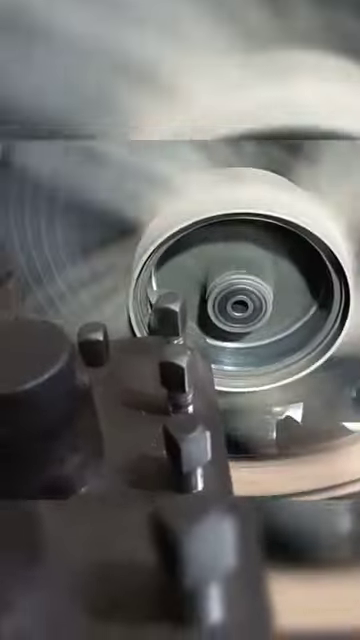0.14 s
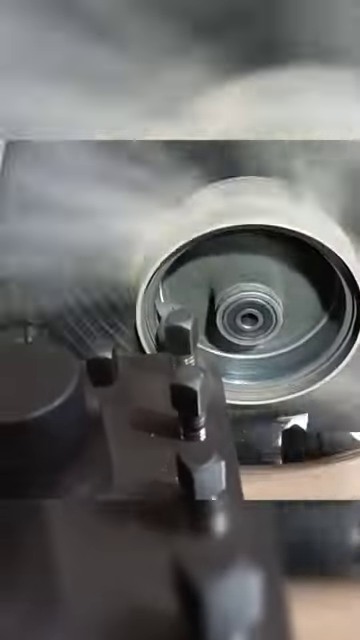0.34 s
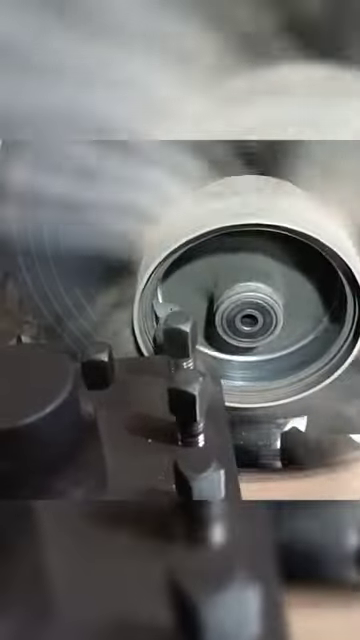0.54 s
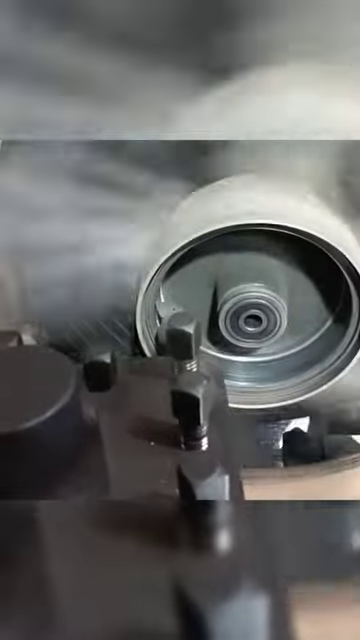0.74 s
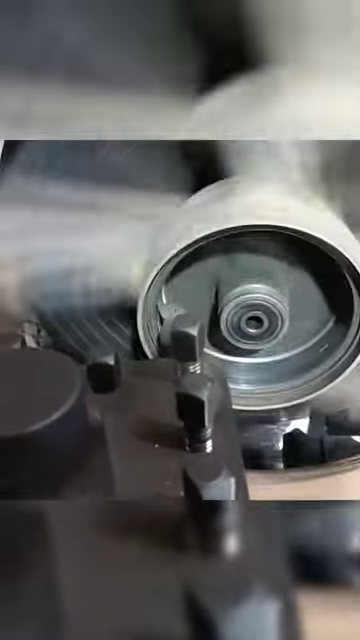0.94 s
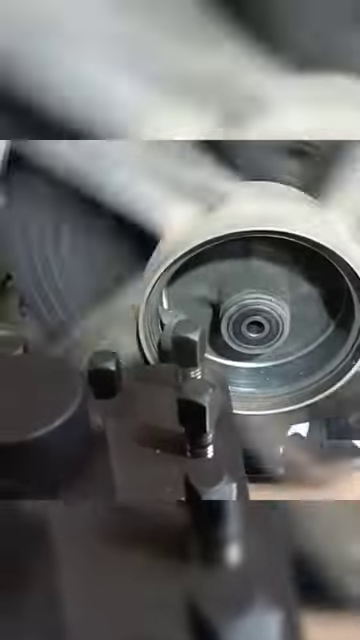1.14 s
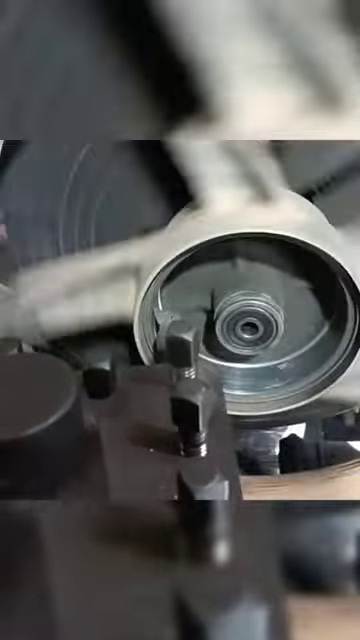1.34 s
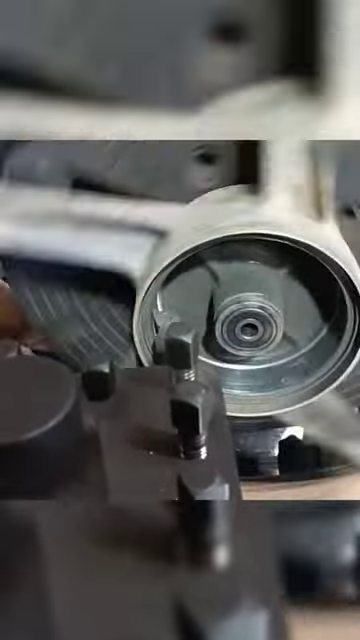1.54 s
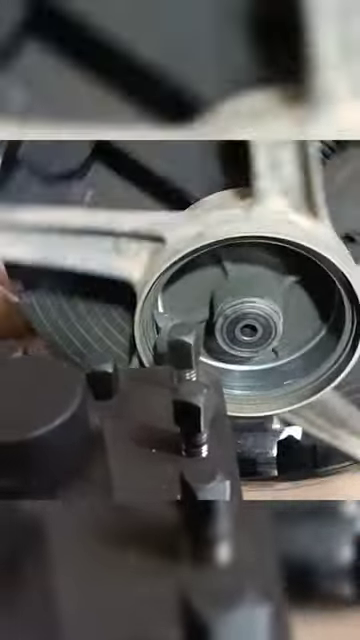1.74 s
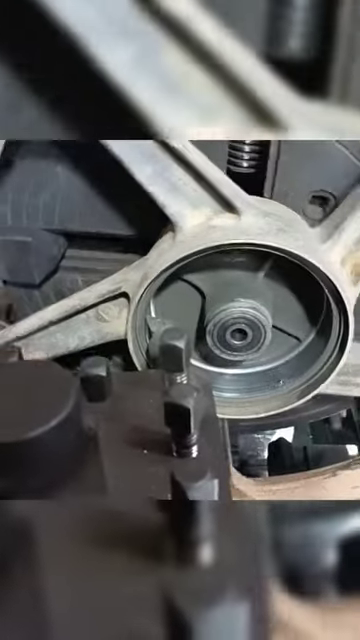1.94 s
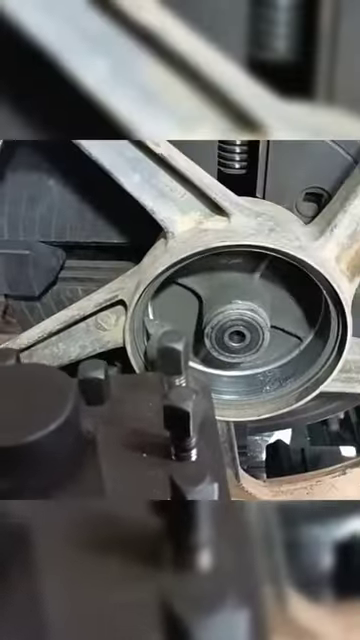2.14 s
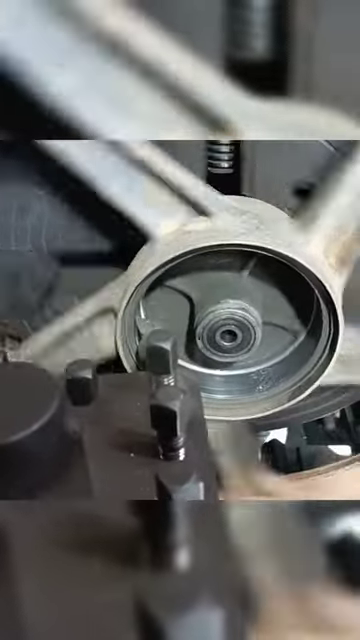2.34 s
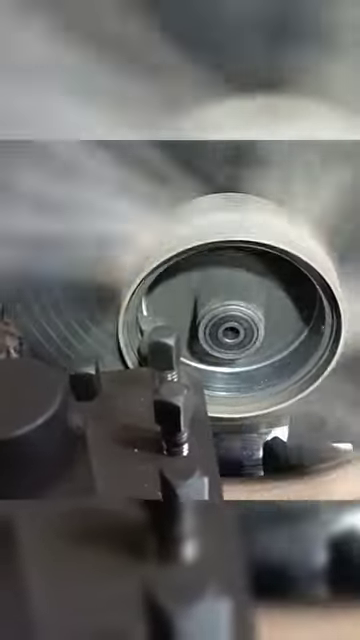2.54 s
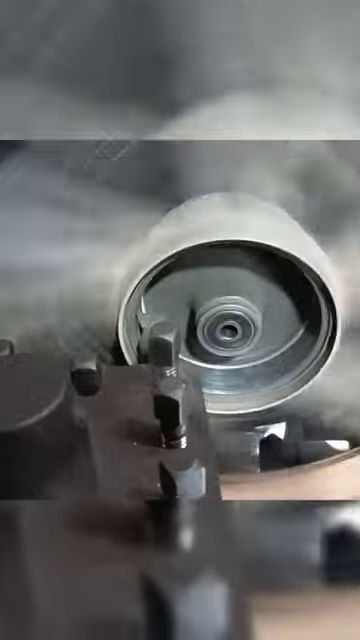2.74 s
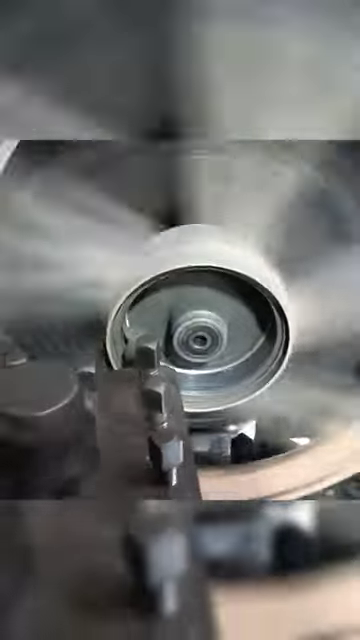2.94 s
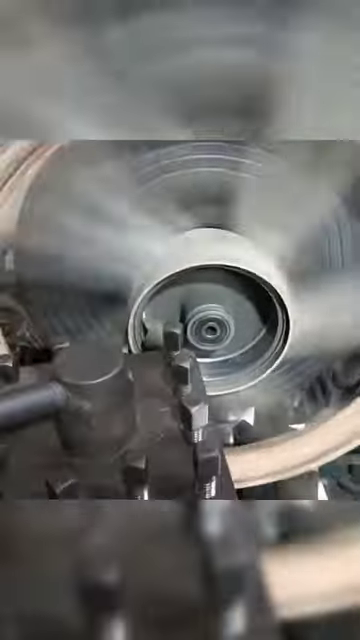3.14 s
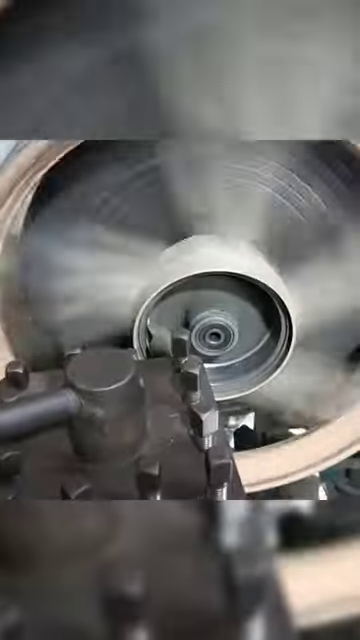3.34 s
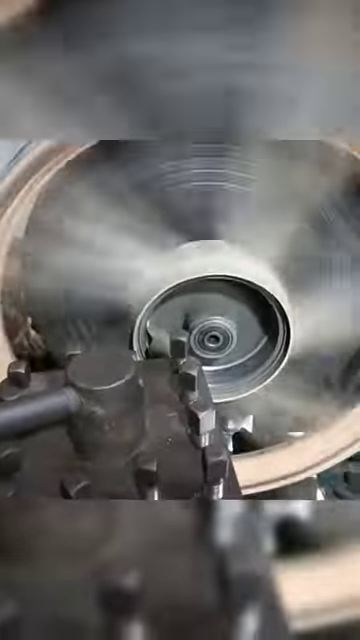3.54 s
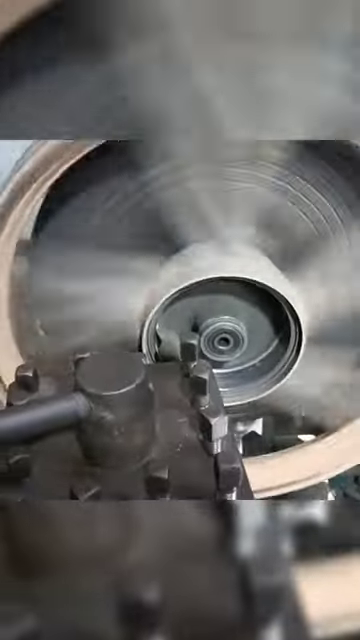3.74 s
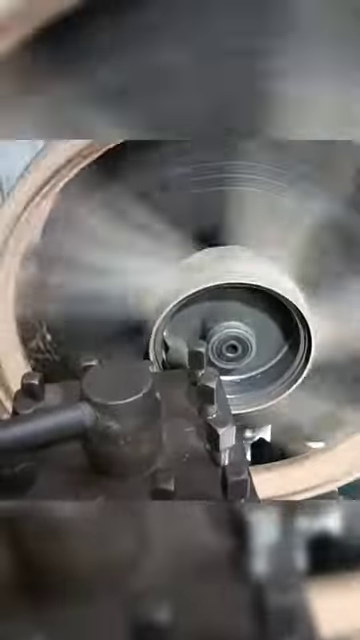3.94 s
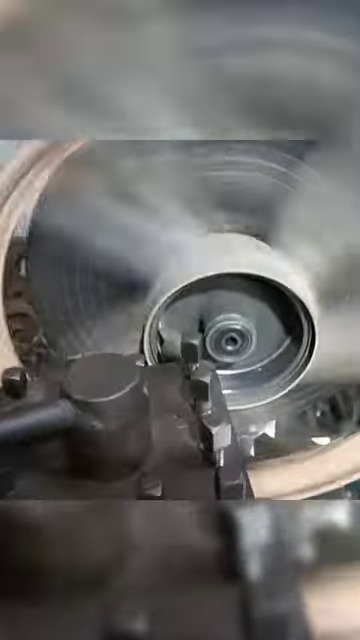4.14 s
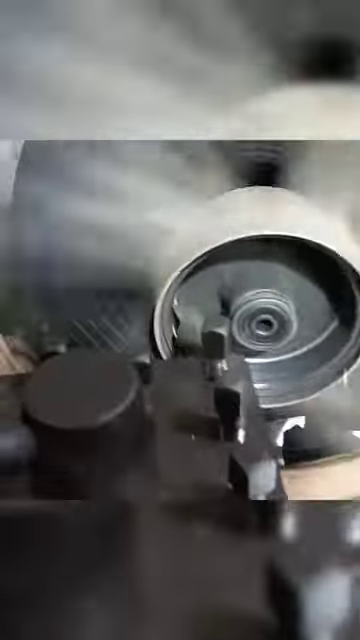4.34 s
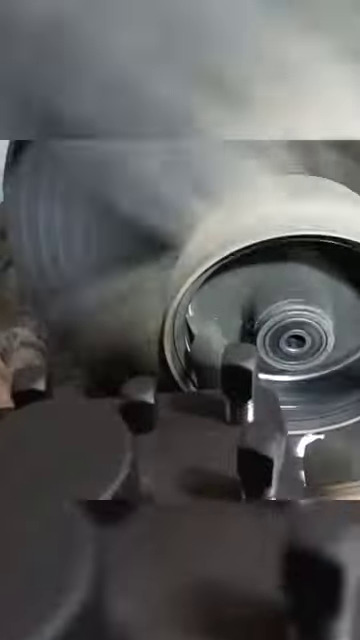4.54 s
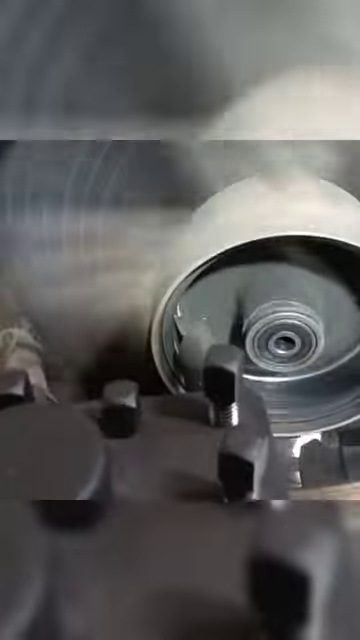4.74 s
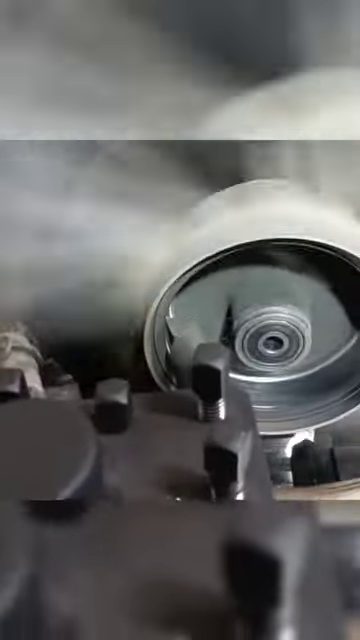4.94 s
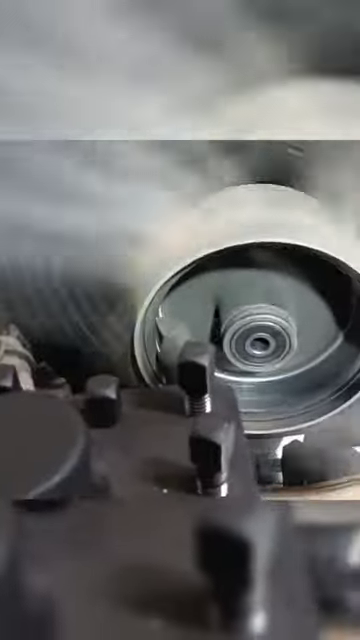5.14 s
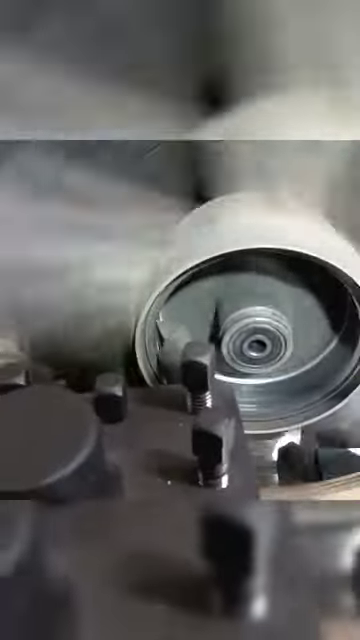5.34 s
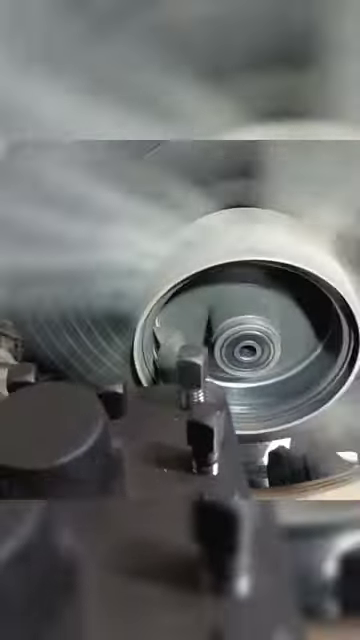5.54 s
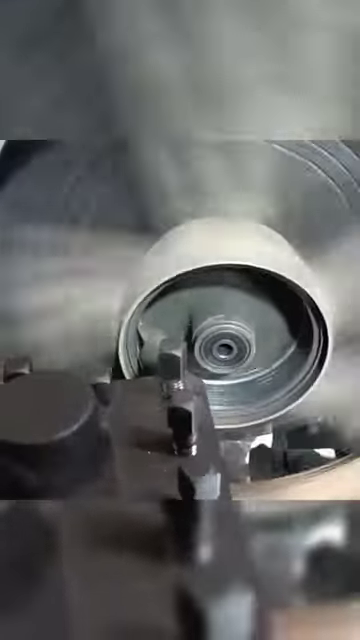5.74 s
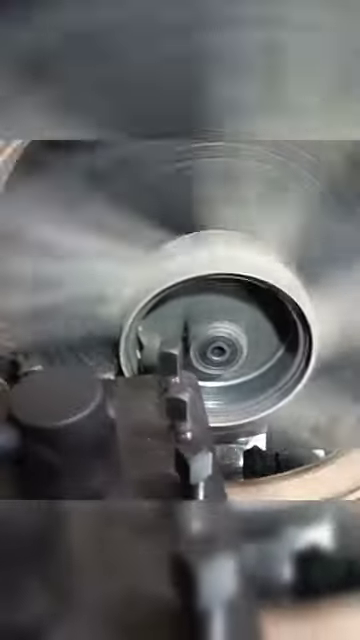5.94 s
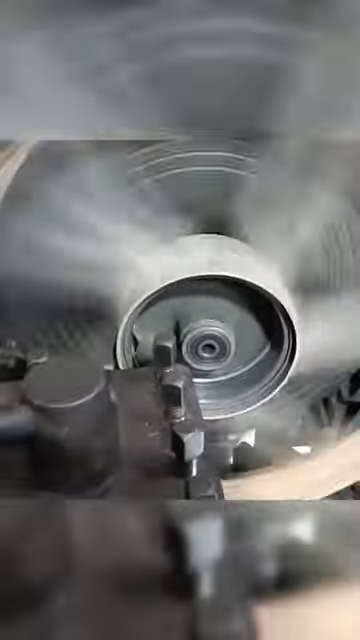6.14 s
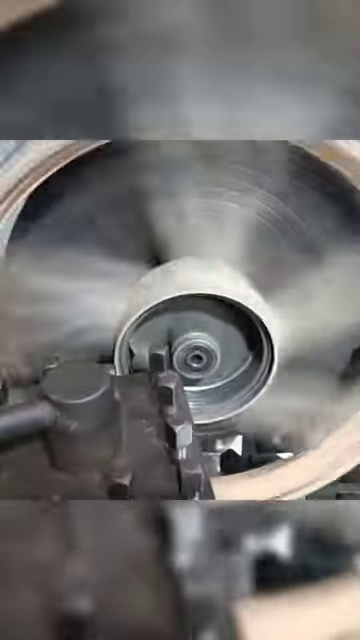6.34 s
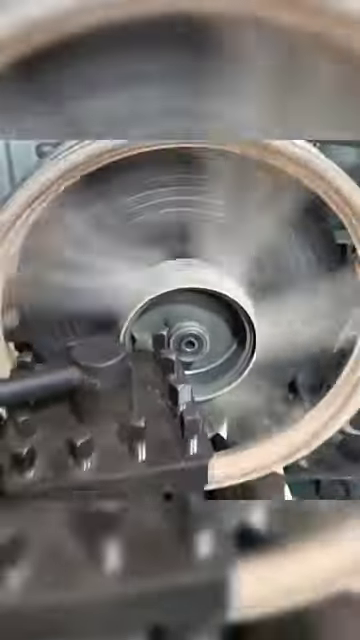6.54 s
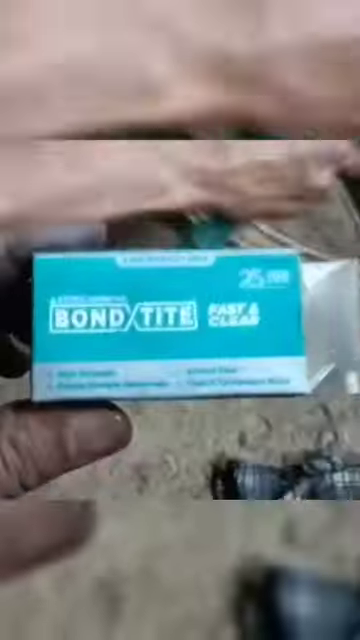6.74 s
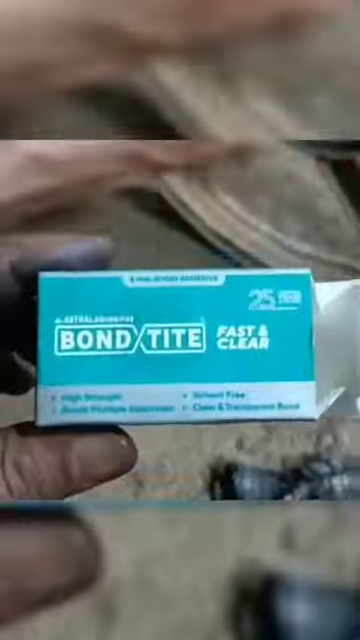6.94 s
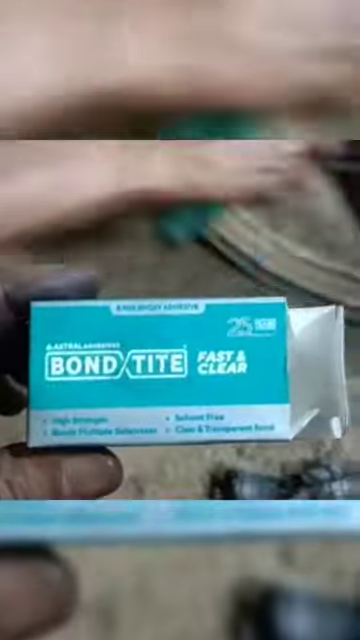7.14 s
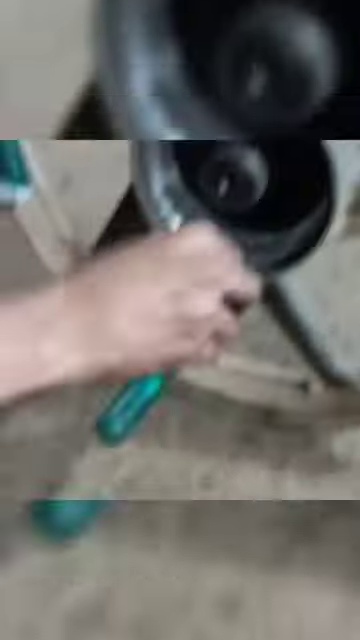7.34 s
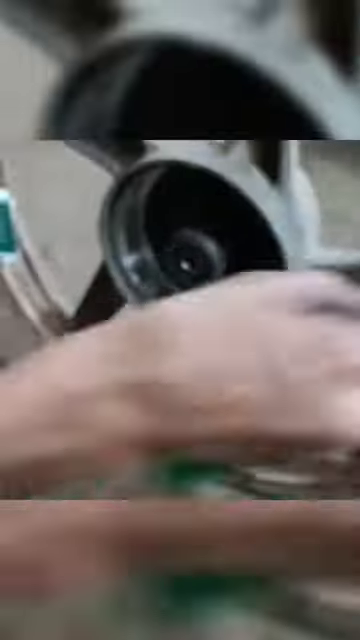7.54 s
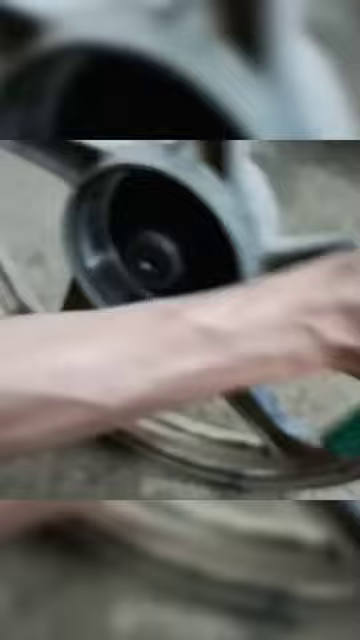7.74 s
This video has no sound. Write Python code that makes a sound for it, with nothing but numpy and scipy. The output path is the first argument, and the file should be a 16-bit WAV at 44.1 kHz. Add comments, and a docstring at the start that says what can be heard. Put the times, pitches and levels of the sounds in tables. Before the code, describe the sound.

Workshop lathe whirs, clunks, slows and restarts; a cutting tool bites rhythmically with loud screechy rasps, then abruptly someone taps and rubs a loose metal wheel.

```python
"""In a workshop, heard by two microphones, a lathe with a humming motor spins a spoked wheel with a brake drum.
Its clutch is thrown out with a double knock, the gears run down, and it is thrown in again; parts squeak and graze.
A boring tool bites the out-of-round drum once a turn, for a second all the way round: noise of tearing chips,
the drum's resonances and a wandering chatter tone make the harsh rasp.
After an abrupt break the wheel is off the lathe, and something is tapped and rubbed inside its ringing drum."""
import sys
import numpy as np
from scipy import signal
from scipy.fft import rfft, irfft, next_fast_len
from scipy.io import wavfile
from scipy.ndimage import uniform_filter1d, map_coordinates

SR = 44100
rng = np.random.default_rng(int(sys.argv[2]) if len(sys.argv) > 2 else 0)


def output_pcm(signal):
    """Save a mono or channel-first signal as 16-bit PCM at the path in sys.argv[1].

    Samples are clipped to [-1, 1] before scaling.
    """
    pcm = np.clip(np.atleast_2d(signal).T, -1, 1) * 32767
    wavfile.write(sys.argv[1], SR, np.round(pcm).astype(np.int16))


N = 343539
TIME = np.arange(N) / SR
LATHE_END_S = 6.77  # the lathe is heard up to here, the loose drum from here on

# drum and tool holder, close at the tool: columns pitch_hz [Hz], width_hz [Hz], level_db [dB, relative]
DRUM_MODES = [(942.5, 13.7, -2.5), (1227, 32, -4.5), (1845, 40, -7), (2275, 31, -0.5), (2562, 34, -1),
              (3430, 75, -21), (4073, 71, 6), (4350, 60, 3), (4593, 58, 2.5), (4880, 59, -1), (5625, 48, 6),
              (5797, 55, 4), (6190, 51, 1), (7790, 107, -3.5), (7860, 33, -5)]
# noise of chips tearing off: columns pitch_hz [Hz], level_db [dB per Hz, relative]
TEARING_SPECTRUM = [(100, -8), (400, -15.5), (800, -13.5), (1300, 4.5), (2400, 8.5), (4500, 13),
                    (7000, 7.5), (8800, 5.5), (10500, -0.5), (11200, -70.5), (12500, -16), (14300, -45),
                    (15200, -29)]
# lean of the cut between the microphones: columns pitch_hz [Hz], left_minus_right_db [dB]
CUT_BALANCE = [(400, 1.5), (1000, 9), (2400, 1.5), (3500, -2.5), (4500, -6), (5600, -7.5), (6300, -6.5),
               (7000, -0.5), (8000, 14.5), (9300, 7.5), (11000, 3.5), (14000, 8.5)]
# shaking tool post: columns pitch_hz [Hz], width_hz [Hz], level_db [dB, relative]
TOOL_POST_MODES = [(80, 25, -6), (196.5, 21, -3), (335, 48, -1.5), (1236, 130, -2)]
# the tool stays in the metal all the way round: start_s [s], attack_s [s], hold_s [s], release_s [s]
DEEP_CUT = (3.954, 0.1, 0.73, 0.16)
FULL_CUT_DB = -17.5  # tool load at full depth
SQUEAL_HZ = 5754  # the boring bar's main bending mode
# chatter gain on the load once the deep cut seats the bar, and what is added before; power of the depth
CHATTER_DB, ENTRY_CHATTER_DB, CHATTER_GROWS = -3.5, -4.5, 0.79
# the tool post shakes until the deep cut seats it: gains on the load
ENTRY_RUMBLE_DB, SEATED_RUMBLE_DB = -16.5, -36


def cutting():
    """Chips break off in uneven spurts and ring the drum; the depth of cut sets their force and brightness."""
    load = tool_load()
    force = load * amp(0.5 * wobble(70))
    depth = np.minimum(load / amp(FULL_CUT_DB), 1)
    seated = envelope(DEEP_CUT[0] + DEEP_CUT[1], DEEP_CUT[1], LATHE_END_S, 1)
    grain = fracture_grain()
    rasp = chip_rasp(grain, depth)
    rumble = unit(filtered(noise(), lambda hz: body(TOOL_POST_MODES, hz)))
    rumble_db = ENTRY_RUMBLE_DB + (SEATED_RUMBLE_DB - ENTRY_RUMBLE_DB) * seated
    # the chatter takes a moment to build up and rings on after each bite
    keep = np.exp(-1 / (0.0072 * SR))
    drive = signal.lfilter([1 - keep], [1, -keep], force * depth ** CHATTER_GROWS)
    chatter_db = CHATTER_DB + ENTRY_CHATTER_DB * (1 - seated)
    sound = force * (amp(-1.5) * rasp + amp(rumble_db) * rumble)
    sound += drive * amp(chatter_db) * bar_chatter(grain)
    sides = lambda hz: amp(np.outer([.5, -.5], along(CUT_BALANCE, hz)))
    # the lean leaves the power of both sides together unchanged
    return filtered(sound, lambda hz: sides(hz) / np.sqrt(np.mean(sides(hz) ** 2, axis=0)))


def fracture_grain():
    """Each fracture is a sharp burst of random strength that decays over some 10 ms."""
    fractures = (rng.random(N) < 260 / SR) * rng.random(N) ** 2
    bursts = signal.lfilter([1], [1, -np.exp(-1 / (0.01 * SR))], fractures)
    return unit(1.5 + unit(bursts))


def chip_rasp(grain, depth):
    """Tearing noise and the drum's resonances, both driven by the fractures; a shallow cut is duller."""
    tearing = coloured(grain * rng.standard_normal((2, N)), TEARING_SPECTRUM)
    ringing = unit(filtered(grain * rng.standard_normal((2, N)), lambda hz: body(DRUM_MODES, hz)))
    rasp = unit(patchy(amp(-4.5) * tearing + amp(-3.5) * ringing, depth_db=3.2))
    treble = filtered(rasp, lambda hz: along([(3800, 0.025), (6500, 0.89)], hz))
    return rasp - (1 - depth ** 0.54) * treble


def bar_chatter(grain):
    """The bar's chatter swells, collapses and wanders in pitch as the chip curls."""
    pitch_hz = SQUEAL_HZ + 75 * wobble(30) + 115 * np.array([wobble(500), wobble(500)])
    swell = amp(7 * np.tanh(wobble(130)) + 1.1 * wobble(20))
    swell = swell * uniform_filter1d(grain, size=130)
    return unit(swell * np.sin(2 * np.pi * np.cumsum(pitch_hz, axis=1) / SR))


# spells in which the tool meets only the drum's high side, once a turn:
# columns first_bite_s [s], end_s [s], turn_s [s], first_level_db [dB], settled_level_db [dB]
SPELLS = [(3.035, 3.83, 0.123, -29, -17.5), (4.843, 6.8, .1257, -14.5, -16.5)]
SETTLE_S = 0.26  # time scale on which the bites approach their settled level
# one pass of the high side at full depth; lighter bites hold for less time
BITE_ATTACK_S, BITE_HOLD_S, BITE_RELEASE_S = 0.0082, .037, 0.022
BITE_SCATTER_S, BITE_SCATTER_DB = 0.0014, 0.14  # chance differences from turn to turn
DEEP_CUT_DB = -17
RUB_FROM_S, RUB_ATTACK_S, RUB_DB = 3.66, 0.23, -29  # the tool's flank rubs the drum, also between bites


def tool_load():
    """Force on the tool: a bite each turn, the deep cut and the rubbing flank add in power."""
    power = (amp(DEEP_CUT_DB + 0.42 * wobble(16)) * envelope(*DEEP_CUT)) ** 2
    flank = envelope(RUB_FROM_S, RUB_ATTACK_S, LATHE_END_S - RUB_FROM_S, RUB_ATTACK_S)
    power += (amp(RUB_DB) * flank) ** 2
    for first, end, turn, first_db, settled_db in SPELLS:
        for s in np.arange(first, end, turn):
            late, harder = rng.standard_normal(2)
            db = settled_db + (first_db - settled_db) * np.exp(-((s - first) / SETTLE_S) ** 2)
            hold = BITE_HOLD_S * np.sqrt(min(amp(db - FULL_CUT_DB), 1))
            bite = envelope(s + BITE_SCATTER_S * late, BITE_ATTACK_S, hold, BITE_RELEASE_S)
            power += (amp(db + BITE_SCATTER_DB * harder) * bite) ** 2
    return np.sqrt(power)


# strokes inside the loose drum, from short taps to long rubs; ring levels come before the modes' own:
# columns start_s [s], length_s [s], scrape_db [dB], low_ring_db [dB], high_ring_db [dB]
STROKES = [(6.795, 0.028, -56, -45, -46), (6.916, 0.0064, -40, -37, -46), (6.946, 0.042, -43, -36.5, -47),
           (7.078, 0.008, -43, -38.5, -53), (7.196, 0.011, -28.5, -29.5, -35.5),
           (7.272, 0.059, -37, -37.5, -38), (7.384, 0.076, -38.5, -46, -45), (7.428, 0.015, -28, -36, -55),
           (7.502, 0.049, -40, -36.5, -48), (7.569, 0.04, -35.5, -31.5, -44), (7.771, 0.036, -27, -46, -35)]
# the loose drum: columns pitch_hz [Hz], width_hz [Hz], tapped_level_db [dB], change_when_rubbed_db [dB]
LOOSE_DRUM_MODES = [(822, 92, -4, -12), (1200, 15, -14.5, -3), (1996, 16, 0.5, 1.5), (2075, 18, -1.5, -3),
                    (2320, 44, -18, -2), (2930, 18, 0.5, -10), (3330, 40, 1, -10), (3990, 17, 2, 1.5),
                    (4660, 28, -8, 1), (5640, 36, -10, 3), (6140, 50, -9, 2)]
RUB_LENGTH_S = .025  # a longer stroke is a rub
LOW_RING_HZ, HIGH_RING_HZ = 2300, 3900  # a stroke's low and high ring levels blend between these


def handling():
    """Each stroke starts sharply and fades; its friction hisses and rings the loose drum."""
    t = np.arange(SR // 2) / SR
    ring, scrape = np.zeros((2, N + SR)), np.zeros(N + SR)
    for s, length, scrape_db, low_db, high_db in STROKES:
        start = round(s * SR)
        pressure = np.exp(-t / length)
        scrape[start:][:len(t)] += amp(scrape_db) * pressure
        for hz, width, db, rubbed_db in LOOSE_DRUM_MODES:
            # a mode builds up under the stroke and then rings out; the rubbing jostles its phase
            swell = signal.lfilter([1], [1, -np.exp(-np.pi * width / SR)], pressure ** 2)
            jostle = np.cumsum(.06 * np.sqrt(pressure) * rng.standard_normal((2, len(t))), axis=1)
            tone = np.sin(2 * np.pi * (hz * t + rng.random((2, 1))) + jostle)
            stroke_db = np.interp(hz, [LOW_RING_HZ, HIGH_RING_HZ], [low_db, high_db])
            level = amp(db + rubbed_db * (length > RUB_LENGTH_S) + stroke_db)
            ring[:, start:][:, :len(t)] += level * swell / swell.max() * tone
    grit_spectrum = [(200, -15), (800, -3.5), (2400, 8.0), (4500, 2), (8000, -3.5), (14500, -14)]  # Hz, dB
    grit = coloured(amp(0.78 * wobble(500)) * noise(), grit_spectrum)
    return 1.47 * ring[:, :N] + scrape[:N] * grit


# clutch contacts: columns start_s [s], knock_db [dB, before the casting's own levels],
# hardness [dB per octave], clack_db [dB], thump_db [dB]
CLUTCH_CONTACTS = [(0.9933, -16, 6, -26.5, -53), (.998, -15.5, -2.5, -29, -63),
                   (1.002, -9.5, -0.5, -34, -33), (1.072, -24, 2, -28, -55),
                   (1.0805, -17.5, -5.5, -50, -33), (2.4211, -9, 9, -24.5, -42),
                   (2.4252, -20, -1, -37, -35), (2.438, -27, 3, -33.5, -14.5)]
# gearbox casting: columns pitch_hz [Hz], level_db [dB], t60_s [s]
CASTING_MODES = [(214, -14, 0.13), (314, -15.5, 0.18), (349, -2.5, 0.075), (406, -0.5, 0.059),
                 (507, 3.5, 0.034), (563, -6, 0.063), (683, -15.5, 0.049), (862, -26, 0.14),
                 (910, -11.5, 0.048), (1444, -29.5, 0.13)]


def clutch():
    """The dogs strike in quick clusters: casting knocks, steel clacks, the bed thumps as it takes the load."""
    t = np.arange(SR // 2) / SR
    knocks, clacks, thumps = np.zeros((3, N))
    for s, knock_db, hardness, clack_db, thump_db in CLUTCH_CONTACTS:
        start = round(s * SR)
        ring = np.zeros(len(t))
        for hz, db, t60 in CASTING_MODES:
            # a harder contact favours the higher modes
            mode_db = db + hardness * np.log2(hz / 500)
            ring += amp(mode_db - 60 * t / t60) * np.sin(2 * np.pi * hz * t)
        thump = amp(thump_db - 60 * t / 0.097) * (1 - np.exp(-t / 0.0039)) * np.sin(2 * np.pi * 135 * t)
        knocks[start:][:len(t)] += amp(knock_db) * (1 - np.exp(-t / 0.0013)) * ring
        clacks[start:][:len(t)] += amp(clack_db - 60 * t / 0.19)
        thumps[start:][:len(t)] += thump
    # the knocks carry no deep bass
    knocks = signal.sosfilt(signal.butter(4, 190, 'highpass', fs=SR, output='sos'), knocks)
    steel_spectrum = [(100, -32), (300, 2.0), (900, 8.5), (1200, 2), (2200, -2), (4700, -3.0),
                      (7000, -15.5), (14000, -14)]  # Hz, dB
    steel = coloured(noise(), steel_spectrum)
    return knocks + amp(-12.0) * room(knocks) + thumps + clacks * steel


# the workshop's decay: columns pitch_hz [Hz], t60_s [s]
ROOM_DECAY = [(150, 0.35), (1500, 0.5), (10000, 0.38)]


def room(x):
    """The workshop's short answer to a mono sound, in stereo: noise that dies at its own rate in each band."""
    hz, t, z = signal.stft(rng.standard_normal((2, SR // 2)), SR, nperseg=256)
    decay = amp(-60 * t / along(ROOM_DECAY, hz)[:, None])
    tail = signal.istft(z * decay, SR, nperseg=256)[1]
    return signal.fftconvolve(x[None], tail / np.linalg.norm(tail[0]), axes=1)[:, :N]


# rattle of loose teeth: columns pitch_hz [Hz], level_db [dB per Hz, relative]
RATTLE_SPECTRUM = [(35, -17.5), (60, 0), (174, -9.5), (229, -12.5), (491, -8.5), (539, -1), (711, -4),
                   (960, 2), (1630, -4.5), (2780, -5), (4310, -7.5), (4730, -4.5), (6530, -19),
                   (15000, -57)]
# headstock: columns pitch_hz [Hz], width_hz [Hz], level_db [dB, relative]
HEADSTOCK_MODES = [(369, 55, 3.5), (535, 37, -16), (638, 36, 8), (941, 31, 9.5), (2007, 110, 5),
                   (2700, 47, 5.5), (4720, 50, 7)]
CLUTCH_OUT_S, CLUTCH_IN_S = 1.0, 2.42
RELEASE_S = 0.33  # the clutch lets go of its load gradually, around the moment it is thrown out
MESH_HZ = 542.7  # tooth rate at full speed
WHINE_DB, RATTLE_DB, IDLE_RATTLE_DB = -54.5, -37, -55  # driven at full speed, before the boom; input shaft alone
COASTING_DB = -11  # unloaded teeth are quieter
# the gear case booms as the tooth rate sweeps through its resonance; share of the boom, in dB, without drive
BOOM_HZ, BOOM_WIDTH_HZ, BOOM_DB, COASTING_BOOM = 411, 76.5, 23, 0.82
# near the stop the teeth clatter through their play: speed and width as shares of full speed
SLACK_SPEED, SLACK_WIDTH, SLACK_DB = .17, 0.08, -42


def gears():
    """Teeth whine roughly at the mesh rate and rattle in the headstock, louder with speed and under drive."""
    speed = spindle()
    coasting = (TIME > CLUTCH_OUT_S) & (TIME < CLUTCH_IN_S)
    unloaded = np.clip(.5 + (TIME - CLUTCH_OUT_S) / RELEASE_S, 0, 1) * (TIME < CLUTCH_IN_S)
    effort = speed * amp(COASTING_DB * unloaded)
    mesh_hz = MESH_HZ * speed
    phase = 2 * np.pi * np.cumsum(mesh_hz * (1 + .045 * wobble(170))) / SR
    resonance = np.exp(-.5 * ((mesh_hz - BOOM_HZ) / BOOM_WIDTH_HZ) ** 2)
    boom = amp(BOOM_DB * np.where(coasting, COASTING_BOOM, 1) * resonance)
    second_pair = np.sin(3 / 2 * phase)  # half as many teeth again
    teeth = np.sin(phase) + 0.5 * second_pair + 0.22 * np.sin(2 * phase) + 0.26 * np.sin(4 * phase)
    whine = effort * boom * amp(WHINE_DB + 1.5 * wobble(60)) * unit(teeth)
    backlash = amp(1.94 * wobble(260) + 0.95 * wobble(28))
    rattle = amp(-1.5) * coloured(backlash * noise(), RATTLE_SPECTRUM)
    rattle += amp(-4.5) * unit(filtered(backlash * noise(), lambda hz: body(HEADSTOCK_MODES, hz)))
    rattle = unit(patchy(rattle, depth_db=2.5))
    slack = coasting * amp(SLACK_DB) * np.exp(-.5 * ((speed - SLACK_SPEED) / SLACK_WIDTH) ** 2)
    rattle_level = np.hypot(effort * amp(RATTLE_DB), amp(IDLE_RATTLE_DB) + slack)
    return whine + rattle_level * rattle


COAST_S, RUN_UP_S = 1.1, .28  # time to stop, and to regain full speed


def spindle():
    """Share of full speed: friction slows the free spindle evenly, then the clutch pulls it up again."""
    coast = np.clip(1 - (TIME - CLUTCH_OUT_S) / COAST_S, 0, 1)
    slip = np.clip(1 - (TIME - CLUTCH_IN_S) / RUN_UP_S, 0, 1)
    return np.maximum(coast, 1 - slip ** 2)


# light grazes and clicks of the turning parts: columns centre_s [s], level_db [dB], length_s [s]
GRAZES = [(0.456, -32, 0.003), (1.167, -39.5, 0.012), (1.852, -42, .012), (1.961, -32.5, 0.01),
          (2.582, -41, 0.016), (2.695, -31.5, 0.018), (2.887, -37.5, 0.013)]


def grazes():
    """Brief rubs of turning metal, bright with the headstock's upper ring."""
    touch = sum(amp(db) * bell(s, length) for s, db, length in GRAZES)
    scratch = amp(1.6 * wobble(400)) * noise()
    hiss = coloured(scratch, [(200, 4), (600, 5.5), (4500, 3), (7000, -12.5), (14000, -21)])  # Hz, dB
    upper_ring = unit(filtered(scratch, lambda hz: body(HEADSTOCK_MODES[-1:], hz)))
    return touch * (0.96 * hiss + 0.47 * upper_ring)


# soft squeaks of the slowing drive: columns centre_s [s], pitch_hz [Hz], level_db [dB], length_s [s]
SQUEAKS = [(1.377, 3070, -47, 0.047), (1.392, 3870, -47, .04), (1.698, 3730, -49.5, 0.034),
           (1.736, 2700, -47, 0.034), (2.102, 3770, -47, .035), (2.2, 3280, -53, .08)]


def squeaks():
    """Each squeak is a soft swell of narrow noise."""
    rub = rng.standard_normal((2, N))
    out = np.zeros((2, N))
    for s, centre_hz, db, length in SQUEAKS:
        band = unit(filtered(rub, lambda hz: body([(centre_hz, 260, 0)], hz) ** 2))
        out += amp(db) * bell(s, length) * band
    return out


# a loose panel drones now and then:
# columns centre_s [s], pitch_hz [Hz], glide [Hz per s], level_db [dB], length_s [s]
DRONES = [(.67, 157.3, 500.5, -42.5, 0.039), (1.03, 83, -80, -45.5, 0.12), (1.25, 203, -2, -41, 0.028),
          (1.36, 198.7, -200, -39, 0.034), (1.47, 140, -500, -46, .03)]


def panel():
    """Each drone is a low gliding tone that swells and fades."""
    tones = np.zeros(N)
    for s, hz, glide, db, length in DRONES:
        phase = 2 * np.pi * np.cumsum(hz + glide * (TIME - s)) / SR
        tones += amp(db) * bell(s, length) * np.sin(phase)
    # sqrt(2) makes the levels rms
    return np.sqrt(2) * amp(1.6 * wobble(51.6)) * tones


# idling motor and belt: columns pitch_hz [Hz], level_db [dB per Hz, relative]
MOTOR_SPECTRUM = [(15, -64.5), (25, -4), (101, -2.5), (163, -6), (207, -5), (326, -5), (558, -8),
                  (709, -11), (1000, -14), (2130, -14), (3180, -10), (4620, -26), (15000, -29.5)]


def motor():
    """The motor and belt idle as steady coloured noise with a slow flutter in level."""
    flutter = amp(1.4 * wobble(9))
    return amp(-44.5) * flutter * coloured(noise(), MOTOR_SPECTRUM)


# the shop around the loose wheel: columns pitch_hz [Hz], level_db [dB per Hz, relative]
SHOP_SPECTRUM = [(15, -32), (25, -1.5), (271, -14), (394, -13), (1310, -19), (1860, -15), (2070, -11),
                 (2300, -15), (4040, -20), (15000, -42)]


def shop():
    """The background of the shop is coloured noise that wavers slowly in level."""
    return amp(-40.5 + 1.75 * wobble(12)) * coloured(noise(), SHOP_SPECTRUM)


# likeness of the two microphones: columns pitch_hz [Hz], likeness [0 to 1]
MICROPHONE_LIKENESS = [(25, 0.61), (60, 1), (180, 1), (350, 0.84), (600, 0.68), (1650, 0.065),
                       (5000, 0.018)]


def noise():
    """White noise at two microphones: alike in the bass, unrelated in the treble."""
    turn = lambda hz: np.arccos(np.clip(along(MICROPHONE_LIKENESS, hz), 0, 1)) / 2
    shares = lambda hz: np.array([np.cos(turn(hz)), np.sin(turn(hz))])
    mid, side = filtered(rng.standard_normal((2, N)), shares)
    return unit(np.array([mid + side, mid - side]))


def patchy(x, depth_db):
    """The turning spokes shift the reflections, so narrow bands swell and fade."""
    z = signal.stft(x, nperseg=1024)[2]
    field = uniform_filter1d(rng.standard_normal(z.shape), size=4, axis=1)
    field = uniform_filter1d(field, size=4, axis=2)
    return signal.istft(z * amp(depth_db * unit(field)), nperseg=1024)[1][:, :N]


def envelope(start, attack, hold, release):
    """Gain that swells to 1 at start, holds and fades, with bell-shaped flanks."""
    t = TIME - start
    rise = np.minimum(t, 0) / attack
    fall = np.maximum(t - hold, 0) / release
    return np.exp(-.5 * rise ** 2 - .5 * fall ** 2)


def bell(s, length):
    """A soft swell centred on s."""
    return envelope(s, length, 0, length)


def wobble(rate):
    """A smooth random curve, rate knots a second."""
    return map_coordinates(rng.standard_normal(int(N * rate / SR) + 4), [TIME * rate])


def body(modes, f):
    """Response of (Hz, width Hz, dB) resonances."""
    return sum(amp(db) * 1j * f * w / (c * c - f * f + 1j * f * w) for c, w, db in modes)


def filtered(x, response):
    """x times a response given as a function of frequency."""
    size = next_fast_len(N + SR // 2)
    return irfft(rfft(x, size) * response(np.fft.rfftfreq(size, 1 / SR)), size)[..., :N]


def coloured(x, spectrum):
    """x shaped by a (Hz, dB) spectrum, at rms 1."""
    return unit(filtered(x, lambda hz: amp(along(spectrum, hz))))


def along(points, hz):
    """(Hz, value) points read on a log axis."""
    f, v = np.transpose(points)
    return np.interp(np.log(hz + 1), np.log(f + 1), v)


def amp(db):
    """Decibels to gain."""
    return 10 ** (np.asarray(db) / 20)


def unit(x):
    """Scale to rms 1."""
    return x / np.sqrt(np.mean(x ** 2) + 1e-20)


def scene():
    """The lathe, its middle treble leaning right, and then the loose wheel, a little to the right."""
    machine = motor() + gears() + panel() + squeaks() + grazes() + clutch()
    lean = [(300, -0.5), (1000, -0.5), (4000, -12.5), (9000, 1.5)]  # Hz, left minus right dB
    top_dulling = [(9500, 0.5), (11500, -10.5), (15000, -13)]  # the highest treble is dulled: Hz, dB
    sides = lambda hz: np.outer([.5, -.5], along(lean, hz))
    machine = filtered(machine, lambda hz: amp(along(top_dulling, hz) + sides(hz)))
    lathe = machine + cutting()
    loose_wheel = shop() + handling() * amp([[-2.5], [2.5]])
    return np.where(TIME < LATHE_END_S, lathe, loose_wheel)


# all sound drops out and returns: columns time_s [s], level_db [dB]
BREAK = [(6.7, 1.5), (6.738, -9.5), (6.755, -58), (6.79, -64.5), (6.805, -26), (6.85, -14), (6.91, -3.5)]
TOP_HZ = 15300  # band limit


def record(dry):
    """A brief break in the sound, softly rounded peaks, and a steep fall above the band limit."""
    break_db = np.interp(TIME, *np.transpose(BREAK))
    x = dry * amp(break_db)
    x = x / (1 + np.abs(x / .92) ** 6) ** (1 / 6)
    return filtered(x, lambda hz: 1 / (1 + (hz / TOP_HZ) ** 120))


dry = scene()
out = record(dry)
output_pcm(out)
```